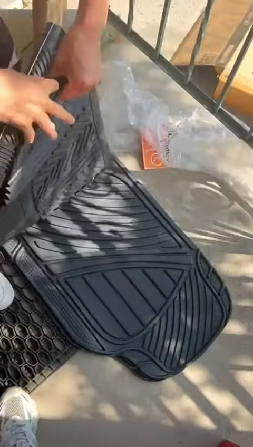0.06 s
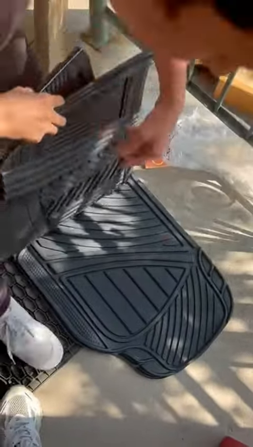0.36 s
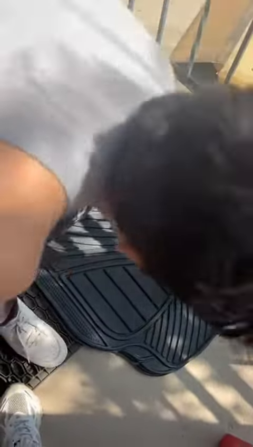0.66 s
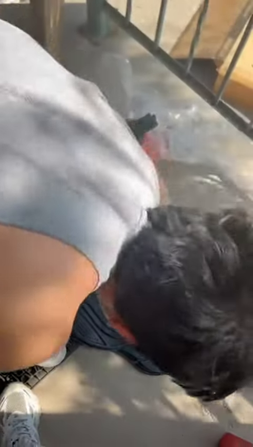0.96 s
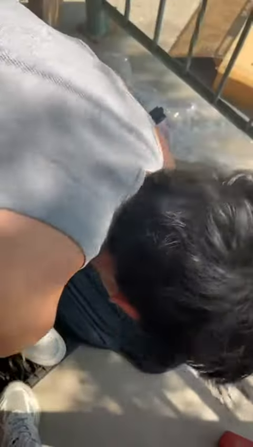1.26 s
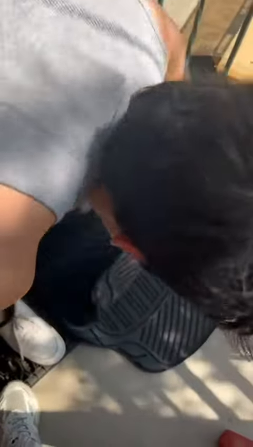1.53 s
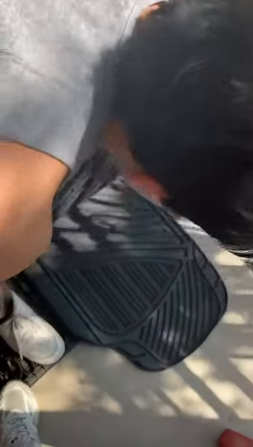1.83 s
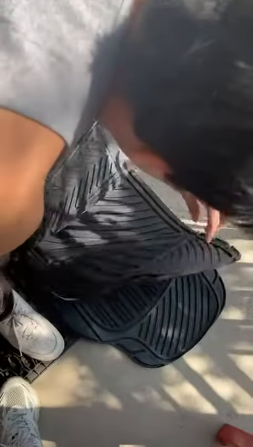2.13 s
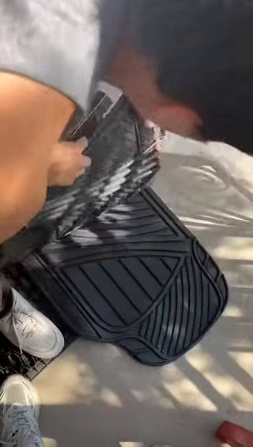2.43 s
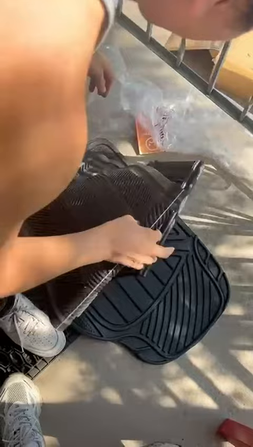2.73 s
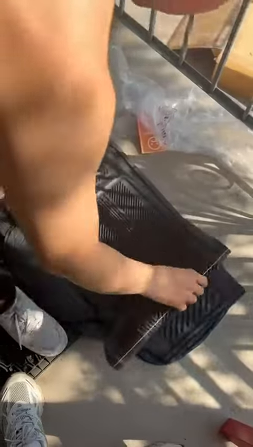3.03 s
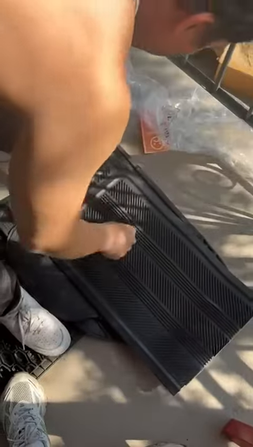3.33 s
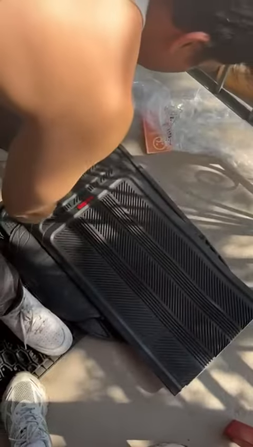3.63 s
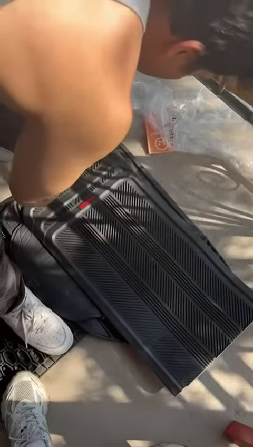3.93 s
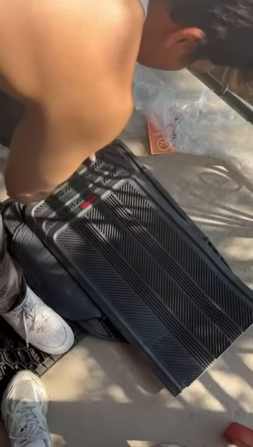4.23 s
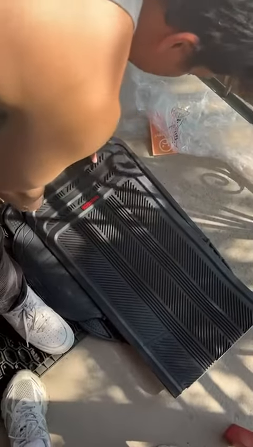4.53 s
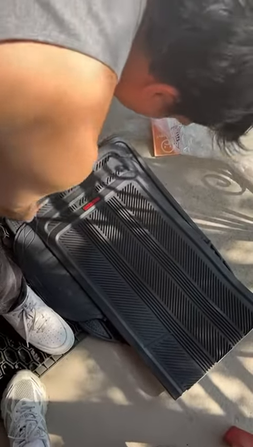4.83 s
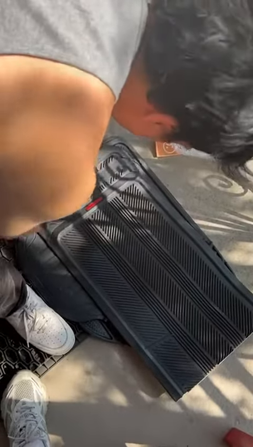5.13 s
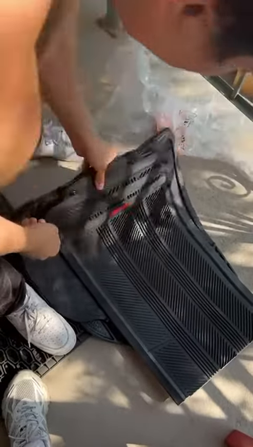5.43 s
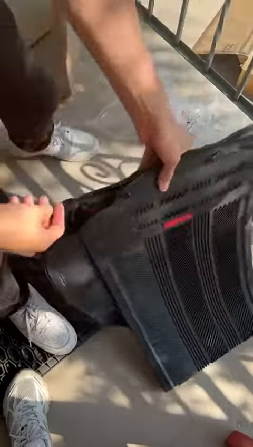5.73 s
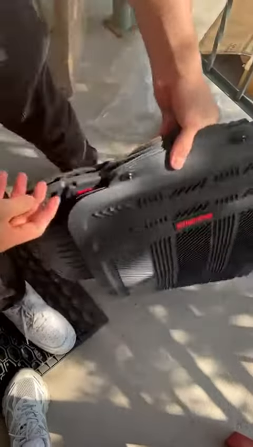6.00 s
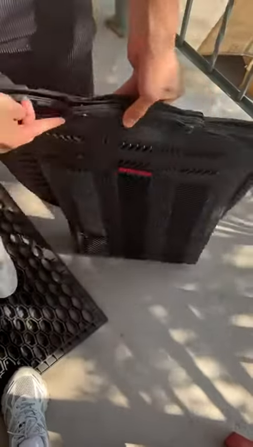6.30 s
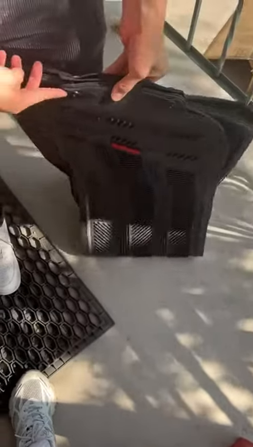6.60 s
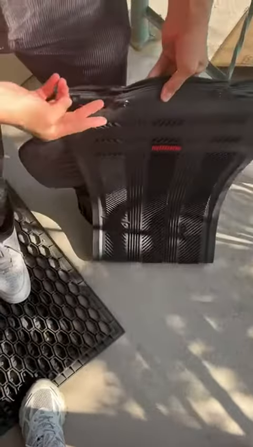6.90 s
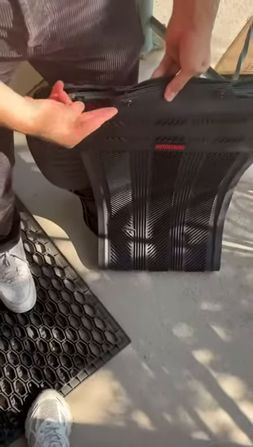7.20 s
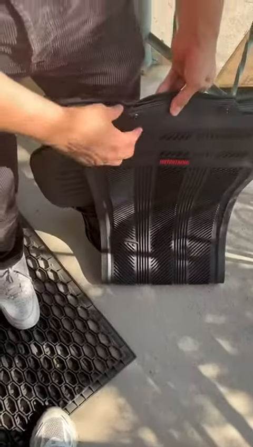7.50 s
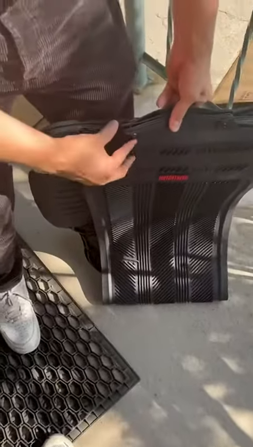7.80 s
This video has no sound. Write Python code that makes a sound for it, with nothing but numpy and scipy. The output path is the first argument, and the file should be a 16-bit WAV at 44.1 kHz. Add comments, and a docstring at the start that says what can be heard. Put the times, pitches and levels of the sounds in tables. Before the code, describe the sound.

A low outdoor rumble and a faint, wavering motor drone run throughout. Close by and slightly to the right, heavy rubber mats rub and tick quietly for the first two seconds. At about 2.2 seconds a mat lands with a loud double slap, hollow pops of trapped air and a low wobble. From 2.8 seconds comes a quick flurry of flaps, snaps and scuffs, ending in the sharpest smack at about 3.2 seconds. The rubbing dies down, and a few light clicks and soft knocks follow between 4.6 and 5.2 seconds. Around 5.7 seconds the rubber drags with short, chattering squawks, then flaps with a soft thump at 6 seconds. Scuffs and small ticks continue until about 6.7 seconds, thinning to faint rubbing up to the end near 8 seconds. The concrete terrace adds a slight, short echo.

```python
"""Heavy rubber car mats slap and scuff on a concrete terrace as they are lifted, dropped and dragged.
Ribbed edges land, trapped air pops out, the sheets ring and wobble; sliding rubber sticks and slips
with ticks, snaps and short squawks. The mats lie a little to the right of two closely spaced
microphones, and walls and railing answer. Far off are a low outdoor rumble and a droning motor."""
import sys
import numpy as np
from scipy import signal
from scipy.fft import rfft, irfft, next_fast_len
from scipy.io import wavfile

SR = 44100
rng = np.random.default_rng(int(sys.argv[2]) if len(sys.argv) > 2 else 0)


def unload_wav(signal):
    """Save mono or channel-first audio to the path in sys.argv[1] as 16-bit WAV at rate SR, clipped to [-1, 1]."""
    wavfile.write(
        sys.argv[1],
        SR,
        np.round(np.clip(np.atleast_2d(signal).T, -1, 1) * 32767).astype(np.int16),
    )


N = 350579
TIME = np.arange(N) / SR
SIZE = next_fast_len(N + SR // 2, True)
BINS = np.maximum(np.fft.rfftfreq(SIZE, 1 / SR), 1)   # Hz
CUTOFF_HZ = 11850
OPPOSED = np.array([[1], [-1]])   # left and right in opposite polarity

# a mat lands or brushes down: t/s, level/dB, swell/s, t60/s, tilt/(dB/octave), ring/dB, gap pitch/Hz
LANDINGS = [(2.167, -27.5, 0.019, 0.071, -8, -61, 720), (2.182, -8.5, 0.0066, 0.049, -3.5, -21, 1135),
            (2.275, -9, 0.011, 0.071, -0.67, -22.5, 1850), (2.872, -30, 0.011, 0.18, -2.2, -50, 1900),
            (2.898, -23, 0.0035, 0.051, -2.5, -54, 570), (2.953, -17.5, 0.008, 0.067, -2, -29.5, 2020),
            (2.994, -17, 0.014, 0.067, -3, -24.5, 740), (3.015, -23.5, 0.019, 0.21, 0.1, -38, 4730),
            (3.241, -12, 0.0035, 0.053, 0.5, -16, 6300), (4.835, -44, 0.0068, 0.096, 3.5, -53, 4700),
            (5.277, -67, 0.064, 0.55, 3.5, -66, 7800), (5.735, -42, 0.042, 0.46, -4.5, -68, 1420),
            (5.835, -45, 0.11, 0.077, -1, -69, 880), (5.966, -44, 0.0061, 0.34, 1, -27.5, 7450),
            (6.346, -38, 0.054, 0.17, 0, -40, 3470)]


def slaps(flurry_per_s=7000, patter_per_s=1600, spread_db=2.5, settle_s=0.02, low_lag_s=0.0025):
    """Ribs land in a flurry that thins to a patter; the lows lag and linger, the closing gap rings."""
    # spectrum of a slap: f/Hz, density/dB
    colour = [(130, -12), (260, -5), (430, 6), (570, -7.5), (700, -2.5), (900, -4.5), (1300, -1),
              (1900, -6.5), (3400, -14), (4900, -13), (6700, -18.5), (8300, -14), (11500, -24.5)]
    edges = 130 * 2 ** (np.arange(21) / 3)   # third octaves, Hz
    centres = np.sqrt(edges[1:] * edges[:-1])[:, None]
    depth = 1000 / centres   # above 1 in the lows
    flurries = [grains(flurry_per_s, spread_db) for _ in range(2)]
    patter = grains(patter_per_s, spread_db)
    out = np.zeros(N)
    for s, db, swell_s, t60, tilt, _, gap_hz in LANDINGS:
        span, t = near(s)
        dense = np.exp(-np.maximum(t, 0) / settle_s)
        forces = [np.sqrt(dense) * hits[span] + np.sqrt(1 - dense) * patter[span] for hits in flurries]
        textures = np.array([rms_one(band(forces[k % 2], edges[k], edges[k + 1])) * (-1) ** k
                             for k in range(len(centres))])
        band_t = t - low_lag_s * (np.sqrt(depth) - 0.5)
        envelopes = fade(-band_t, 3 * swell_s) * fade(band_t, t60 * depth ** 0.33)
        gains = from_db(at_hz(colour, centres) - tilt * np.log2(depth)) * np.sqrt(centres)
        slap = from_db(db - 1.5) * (gains / np.linalg.norm(gains) * textures * envelopes).sum(axis=0)
        out[span] += slap + from_db(3) * resonance(slap, gap_hz, width_hz=0.072 * gap_hz)
    return out


def sheet_ring(lag_s=0.002):
    """Every landing sets the damped modes of the sheet ringing, each time a little differently."""
    # modes of the rubber sheet: f/Hz, level/dB, t60/s
    modes = [(104.5, 0.5, 0.21), (134.7, -1, 0.41), (176, -3, 0.036), (230.3, -5, 0.31), (266.3, 5, 0.11),
             (296, 3, 0.066), (384, -20, 0.6), (537, -20, 0.21), (720, -19, 0.025), (1053, -19, 0.095)]
    out = np.zeros(N)
    for s, *_, ring_db, _ in LANDINGS:
        span, t = near(s + lag_s)
        for k, (hz, db, t60) in enumerate(modes):
            gain = (-1) ** k * from_db(ring_db + db + rng.standard_normal())
            out[span] += gain * swing(t, hz, t60, driven_s=0, build_cycles=0.72)
    return out


def pops_and_rings(puff_db=-17, puff_ratio=2.3):
    """Hollow pops of trapped air and low rings of the rubber sheet, each with a puff around its pitch."""
    # air pops and sheet rings: t/s, level/dB, f/Hz, t60/s
    tones = [(1.797, -32, 436, 0.082), (2.18, -13.5, 401, 0.11), (2.2, -23.5, 264, 0.32),
             (2.281, -6.5, 400, 0.069), (2.283, -16, 647, 0.096), (2.319, -16, 382, 0.17),
             (2.814, -28, 411, 0.1), (2.898, -13.5, 410, 0.026), (2.955, -16, 350, 0.055),
             (2.993, -9, 434, 0.043), (3.005, -14.5, 400, 0.025), (3.035, -22.5, 398, 0.11),
             (3.076, -17.5, 373, 0.034), (3.24, -2.5, 450, 0.025), (3.246, -9.5, 139.3, 0.2),
             (4.645, -38.5, 462, 0.065), (4.836, -32, 333, 0.026), (4.877, -34, 347, 0.045),
             (5.057, -18, 368, 0.018), (5.218, -24, 404, 0.026), (5.964, -18.5, 279, 0.031),
             (5.966, -21, 188, 0.092), (6.359, -35.5, 157, 0.13), (6.408, -33, 430, 0.055),
             (6.424, -31.5, 410, 0.053), (6.522, -38, 450, 0.033)]
    out = np.zeros(N)
    for s, db, hz, t60 in tones:
        span, t = near(s)
        noise = rms_one(band(rng.standard_normal(len(t)), hz / puff_ratio, hz * puff_ratio))
        puff = from_db(puff_db) * noise * (t > 0) * fade(t, t60)
        ring = swing(t, hz, t60, driven_s=0.0027, build_cycles=0.31)
        out[span] += from_db(db) * (ring + puff)
    return band(out, 60, 750)   # soft rubber rounds the attack


def wobbles():
    """The whole heavy sheet flaps and pumps air."""
    # flaps of the sheet: t/s, level/dB, f/Hz, time driven/s
    flaps = [(0.346, -28, 67.6, 0.0091), (2.194, -15, 51.2, 0.11), (2.285, -20.5, 76.6, 0.021),
             (2.926, -23.5, 56, 0.1), (3.241, -11.5, 51, 0.021), (5.981, -22.5, 52, 0.068),
             (6.332, -23.5, 49.8, 0.11)]
    out = np.zeros(N)
    for s, db, hz, driven_s in flaps:
        span, t = near(s)
        out[span] += from_db(db) * swing(t, hz, t60=0.37, driven_s=driven_s, build_cycles=0.34)
    return out


def snaps(band_ratio=1.73, patter_db=-11):
    """A stiff edge flicks free: one sharp click, then a few milliseconds of patter."""
    # edges letting go: t/s, level/dB, centre f/Hz
    releases = [(.033, -37.5, 3000), (.345, -43, 3970), (0.491, -34, 2600), (.745, -40, 7000),
                (2.062, -41, 5000), (2.182, -12.5, 2370), (2.189, -24, 3200), (2.875, -24, 1990),
                (2.896, -27, 2200), (2.953, -10.5, 3400), (2.994, -20, 3000), (3.016, -9, 2500),
                (3.147, -31, 3530), (3.215, -32, 3000), (3.233, -32, 2400), (3.242, -6, 6050),
                (4.625, -29, 7000), (4.646, -33, 1500), (4.666, -28.5, 3300), (4.837, -33, 2500),
                (5.032, -42, 5470), (5.046, -42, 3500), (5.058, -45, 4500), (5.672, -37, 4000),
                (6.165, -38, 3000), (6.354, -26.5, 4130), (7.29, -51, 5070), (7.57, -45, 7000)]
    out = np.zeros(N)
    for s, db, hz in releases:
        span, t = near(s)
        force = from_db(patter_db) * rng.standard_normal(len(t)) * (t > 0) * fade(t, t60=0.011)
        force[np.argmax(t > 0)] = 2   # the click itself
        click = band(force, hz / band_ratio, hz * band_ratio)
        out[span] += from_db(db - 1) * click / np.abs(click).max()
    return out


def ticks(catches, patter_t60=0.085, crack_t60=0.032, band_ratio=1.34, skirt_db=-22):
    """A catch lets go with a dull knock and a short patter around one resonance."""
    out = np.zeros(N)
    for s, db, hz in catches:
        span, t = near(s)
        force = rng.choice([-1, 1], len(t)) * (t > 0) * (fade(t, patter_t60) + fade(t, crack_t60))
        low, high = hz / band_ratio, hz * band_ratio
        knock = band(force, low, high) + from_db(skirt_db) * band(force, low / 2, 2 * high)
        out[span] += from_db(db - 2) * knock / np.abs(knock).max()
    return out


def hard_catches():
    """A rib or a finger catches hard and lets go with a tick."""
    # catches: t/s, level/dB, centre f/Hz
    catches = [(.033, -43, 1300), (.125, -51, 1610), (0.342, -43, 805), (0.433, -38, 905),
               (.487, -53, 1090), (1.083, -48, 1000), (1.723, -45, 910), (1.794, -35, 1370),
               (1.833, -42.5, 1340), (1.963, -45, 1600), (2.187, -12, 800), (2.196, -17, 950),
               (2.361, -29, 1800), (2.407, -29, 920), (2.828, -31, 714), (2.836, -27.5, 700),
               (2.899, -20, 650), (2.916, -30, 720), (3.029, -31, 1500), (3.053, -23.5, 1210),
               (3.107, -44, 910), (3.124, -40, 800), (3.147, -35, 1870), (3.171, -26.5, 1020),
               (3.203, -36, 800), (3.232, -6.5, 1280), (3.245, -9.5, 680), (3.306, -30.5, 1980),
               (3.43, -40, 1398), (4.644, -30, 950), (4.837, -35, 910), (4.876, -37.5, 780),
               (5.056, -47, 800), (5.718, -37, 700), (5.861, -45, 750), (6.109, -39, 850),
               (6.164, -31.5, 1040), (6.174, -41.5, 3600), (6.263, -31.5, 980), (6.346, -34, 760),
               (6.392, -37, 760), (6.408, -41, 1310), (6.424, -36, 760), (6.466, -39.5, 900),
               (6.541, -35, 1000), (6.585, -40, 853), (6.626, -46, 800), (6.66, -43, 1280),
               (6.712, -47, 1200), (6.96, -54, 1200)]
    return ticks(catches)


def small_catches(scuff_db, per_s=8, base_db=-52.5, spread_db=2, centre_hz=1370):
    """Sliding rubber catches at random, harder as the scuffing gets louder."""
    times = TIME[rng.random(N) < per_s / SR]
    times = times[times < TIME[-1] - 0.05]
    strength, octaves = rng.standard_normal((len(times), 2)).T
    db = base_db + np.interp(times, TIME, scuff_db - scuff_db.mean()) + spread_db * strength
    hz = centre_hz * 2 ** np.clip(octaves, -2, 2)
    return ticks(zip(times, db, hz))


def scuff_level(run_up_db=14.5, run_up_curve=1.26):
    """Level of the sliding in dB: each pull gathers speed, levels off and stops, over a faint grip."""
    # pulls over rubber or concrete: fastest at t/s, level/dB, run-up/s, stopping t60/s
    pulls = [(.35, -48, 0.018, 0.12), (2.175, -51, 0.034, 0.061), (2.34, -42, 0.1, 0.64),
             (2.83, -45, 0.2, 0.33), (2.91, -38, 0.062, .16), (3.01, -32, 0.12, 0.31),
             (3.211, -41, 0.16, 0.91), (4.65, -46.5, 0.057, 0.21), (4.84, -53, 0.031, 0.31),
             (5.051, -46.5, 0.028, 0.19), (5.28, -52.5, 0.17, 0.45), (5.745, -43.5, 0.27, 0.67),
             (5.855, -41, 0.16, 0.13), (6.17, -50, 0.1, 0.14), (6.345, -42, 0.085, 0.45),
             (6.41, -46, 0.038, 0.47), (6.64, -51.5, 0.17, 0.29)]
    # scuffing under the gripping hands: t/s, level/dB
    grip = [(0, -55), (.9, -57), (2.6, -58.5), (4.3, -61.5), (5.5, -60), (6.8, -59.5), (7.3, -62.5),
            (7.95, -57.5)]
    power = from_db(np.interp(TIME, *np.transpose(grip))) ** 2
    for s, db, run_up_s, t60 in pulls:
        to_go = np.clip((s - TIME) / run_up_s, 0, 10)
        rise = from_db(db - run_up_db * to_go ** run_up_curve)
        power += (rise * fade(np.minimum(TIME - s, 2), t60)) ** 2
    return 10 * np.log10(power)


def rubbing(scuff_db, slips_per_s=1500, ribs_per_s=170, spread_db=2, flex_octaves=0.059, judder_db=0.5):
    """Fine stick-slip grains, and coarser flicks of the ribs that shift in pitch as the sheet flexes."""
    # spectrum of sliding rubber: f/Hz, density/dB
    colour = [(120, -19), (280, 0.5), (450, 2.5), (720, -3.5), (860, -10.5), (1100, -7.5), (1400, -15),
              (2000, -16), (2600, -14.5), (3400, -21), (4300, -23), (7000, -27), (11500, -41.5)]
    # tones of a flicked rib: f/Hz, level/dB
    rib_tones = [(440, -5.5), (530, -4), (865, -7), (1400, -8.5), (1600, -19.5), (2050, -17.5),
                 (3300, -17.5)]
    slips = rms_one(shaped(grains(slips_per_s, spread_db), from_db(at_hz(colour, BINS))))
    flicks = sum(from_db(db) * rms_one(band(grains(ribs_per_s, spread_db), hz - 50, hz + 50))
                 for hz, db in rib_tones)
    pitch_ratio = 2 ** (flex_octaves * drift(per_s=12))
    flicks = np.interp(np.cumsum(pitch_ratio) % N, np.arange(N), flicks)
    rib_gain = from_db(-8 + 0.23 * (scuff_db - scuff_db.mean()))   # ribs stand out in a hard pull
    return from_db(scuff_db + judder_db * drift(per_s=70)) * (slips + rib_gain * flicks)


def squawks(jitter_octaves=0.0684, rough_db=2, rough_per_s=150, overtone_db=-17):
    """Dragged rubber chatters: stick and slip lock briefly onto one pitch, unsteady in rate and force."""
    # bursts of chatter: loudest at t/s, level/dB, half-length/s, f/Hz
    bursts = [(2.171, -35, 0.013, 880), (5.657, -53, .012, 870), (5.668, -42, 0.015, 490),
              (5.708, -50, .012, 895), (5.73, -36.5, 0.022, 440), (5.78, -35.5, 0.015, 419.5),
              (5.796, -40, .01, 868), (5.829, -34.5, .014, 857), (5.862, -46, .008, 430)]
    pitch_ratio = 2 ** (jitter_octaves * drift(rough_per_s))
    strength = from_db(rough_db * drift(rough_per_s))
    out = np.zeros(N)
    for s, db, half_s, hz in bursts:
        span, t = near(s)
        phase = 2 * np.pi * np.cumsum(hz * pitch_ratio[span]) / SR
        chatter = rms_one(strength[span] * (np.sin(phase) + from_db(overtone_db) * np.sin(2 * phase)))
        out[span] += from_db(db - 1) * chatter * np.exp(-(t / half_s) ** 2)
    return out


def grooves(contacts, direct_db=-2):
    """The hollows of the tread add short, well damped resonances to the contacts."""
    # hollows between the ribs: f/Hz, width/Hz, level/dB
    hollows = [(660, 100, -2.5), (750, 110, -7), (1110, 80, -14), (1280, 63, -10.5), (1510, 70, -11),
               (1860, 85, -11), (2100, 160, -12), (2570, 300, -2), (2950, 220, 0.5), (5030, 420, -4),
               (6560, 670, -10)]
    ring = sum(from_db(db) * resonance(contacts, hz, max(width, 70)) for hz, width, db in hollows)
    return from_db(direct_db) * contacts + ring


def terrace(x, wall_delay_s=0.012, apart=0.3):
    """Ground and mats scatter the treble at once; walls and railing answer a little later."""
    t = TIME[:SR // 2]

    def scatter(db, t60, low_hz, high_hz):
        """Response of one cloud of echoes, slightly different at each microphone."""
        shared, own = rng.standard_normal((2, len(t)))
        cloud = band((shared + apart * OPPOSED * own) * fade(t, t60), low_hz, high_hz)
        return from_db(db) * rfft(rms_one(cloud), SIZE) * np.sqrt(2 * (high_hz - low_hz) / SR / len(t))

    walls = scatter(db=-16, t60=0.24, low_hz=200, high_hz=4500)
    ground = scatter(db=-6.5, t60=0.1, low_hz=1700, high_hz=CUTOFF_HZ)
    return shaped(x, 1 + ground + walls * np.exp(-2j * np.pi * BINS * wall_delay_s))


def rumble(level_db=-42.5, swell_db=1, apart=0.063, apart_hz=700):
    """Distant outdoor noise, the same at both microphones in the bass."""
    # spectrum of the open air: f/Hz, density/dB
    colour = [(20, -27), (38, -9.5), (56, -2), (75, -3.5), (105, -7.5), (200, -15), (350, -19.5),
              (560, -30.5), (1000, -37.5), (2000, -48), (3000, -51.5), (5000, -49), (8000, -59),
              (10500, -73)]
    sides = OPPOSED * shaped(rng.standard_normal(N), apart / (1 + apart_hz / BINS))
    air = shaped(rng.standard_normal(N) + sides, from_db(at_hz(colour, BINS)))
    return from_db(level_db + swell_db * drift(per_s=8.5)) * rms_one(air)


def distant_motor(pitch_hz=72.4, level_db=-44, wander_hz=3.576, waver_db=2):
    """A motor drones under the rumble, its pitch and level wavering with the distance."""
    # the drone swells and sinks: t/s, level/dB
    swell = [(0, -2.5), (1.7, 0), (2.6, 0), (3.8, 3), (4.6, -0.5), (5.3, -7.5), (6.6, 2.5), (7.2, -2),
             (7.95, -1)]
    hz = pitch_hz + wander_hz * drift(per_s=7)
    db = level_db + np.interp(TIME, *np.transpose(swell)) + waver_db * drift(per_s=6)
    return from_db(db) * rms_one(np.sin(2 * np.pi * np.cumsum(hz) / SR))


def from_db(db):
    """Decibels to gain."""
    return 10 ** (np.asarray(db) / 20)


def rms_one(x):
    """Scale to unit power."""
    return x / np.sqrt(np.mean(x ** 2) + 1e-20)


def at_hz(points, hz):
    """Read a table on a log-frequency axis."""
    f, value = np.transpose(points)
    return np.interp(np.log(hz), np.log(f), value)


def shaped(x, response):
    """Filter by a response given on BINS."""
    return irfft(rfft(x, SIZE) * response, SIZE)[..., :N]


def band(x, low_hz, high_hz):
    """Causal band-pass."""
    sos = signal.butter(2, [low_hz, min(high_hz, SR / 2 - 100)], "band", fs=SR, output="sos")
    return signal.sosfilt(sos, x + 1e-18)


def resonance(x, hz, width_hz):
    """A damped cavity; unit gain at its centre."""
    return signal.lfilter(*signal.iirpeak(hz, hz / width_hz, fs=SR), x + 1e-18)


def drift(per_s):
    """Smooth random motion that changes about `per_s` times a second; rms 1."""
    return rms_one(shaped(rng.standard_normal(N), 1 / (1 + (BINS / per_s) ** 2)))


def grains(per_s, spread_db):
    """Tiny contacts of uneven size at random moments; rms 1."""
    sizes = from_db(spread_db * np.minimum(rng.exponential(1, N), 4)) * rng.choice([-1, 1], N)
    return rms_one(sizes * (rng.random(N) < per_s / SR))


def fade(t, t60):
    """Unity until t = 0, then 60 dB down every t60."""
    return np.exp(-np.log(1000) * np.maximum(t, 0) / t60)


def near(s):
    """The samples around an event and their times from it."""
    span = slice(max(int((s - 0.1) * SR), 0), int((s + 0.5) * SR))
    return span, TIME[span] - s


def swing(t, hz, t60, driven_s, build_cycles):
    """A resonance builds up, is driven for a while and dies away."""
    cycles = np.maximum(t, 0) * hz
    return np.sin(2 * np.pi * cycles) * (1 - np.exp(-cycles / build_cycles)) * fade(t - driven_s, t60)


def widened(centre, edges, width_db):
    """A wide sheet: its centre reaches both microphones alike, its edges reach them in opposition."""
    return centre + from_db(width_db) * OPPOSED * edges


def scene():
    """The mats on the terrace, a little right of the microphones, with rumble and motor far behind."""
    # direction of the mats by level: f/Hz, left minus right/dB
    balance = [(170, 0), (430, -1.2), (620, -3.3), (1500, -2.6), (2500, -2.8), (3600, 0), (4900, -1.5),
               (8000, 1)]
    # direction of the mats by phase: f/Hz, lead of the left/rad
    lead = [(70, 0), (250, -.1), (550, -.5), (1100, -.3), (1700, 0)]
    scuff_db = scuff_level()
    landings = widened(slaps(), slaps(), width_db=-11.5)
    contacts = landings + hard_catches() + snaps() + small_catches(scuff_db)
    sliding = widened(rubbing(scuff_db), rubbing(scuff_db), width_db=-14.5)
    mats = terrace(grooves(contacts) + sheet_ring() + pops_and_rings() + wobbles() + squawks() + sliding)
    half = OPPOSED / 2
    direction = from_db(half * at_hz(balance, BINS)) * np.exp(1j * half * at_hz(lead, BINS))
    return shaped(mats, direction) + rumble() + distant_motor()


def record(dry, ceiling=0.63):
    """The left-right phase turns with frequency, spreading the treble; peaks are rounded, the top cut."""
    # phase between left and right: f/Hz, lead of the left/rad
    stereo_phase = [(70, 0), (700, -.25), (1400, -.1), (1750, .3), (2250, 1.9), (2650, 2.6), (3200, 2.2),
                    (3750, 1.1), (4950, 1.7), (5300, 3), (6100, 3.5), (7100, 6.2), (8400, 6.6), (9200, 9.2),
                    (10900, 9.6), (11900, 12.2)]
    sides = shaped(dry, np.exp(1j * at_hz(stereo_phase, BINS) * np.array([[0], [-1]])))
    rounded = sides / (1 + (sides / ceiling) ** 6) ** (1 / 6)
    return shaped(rounded, 1 / np.sqrt(1 + (BINS / CUTOFF_HZ) ** 120))


dry = scene()
out = record(dry)
unload_wav(out)
```